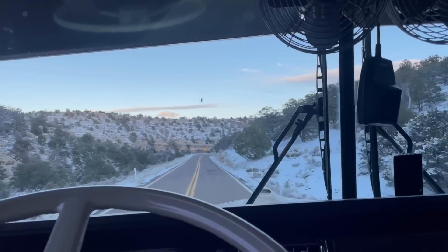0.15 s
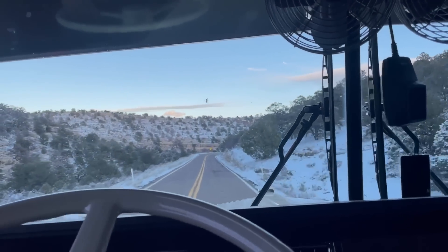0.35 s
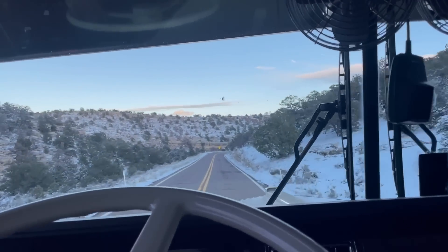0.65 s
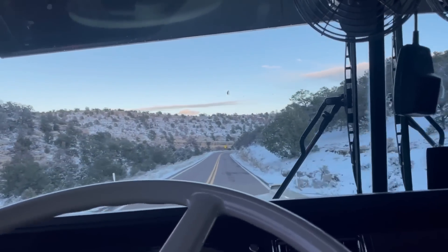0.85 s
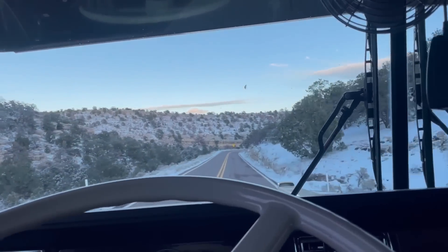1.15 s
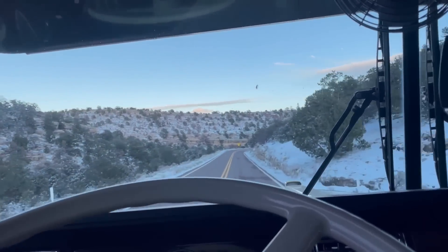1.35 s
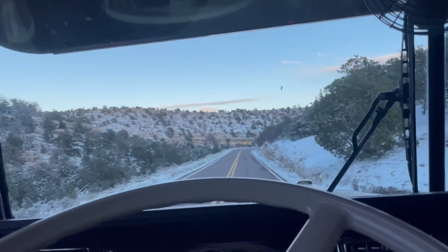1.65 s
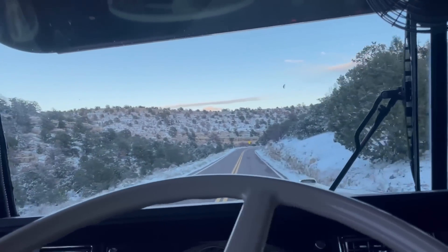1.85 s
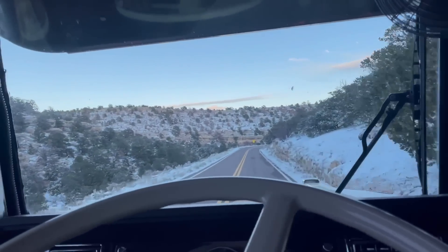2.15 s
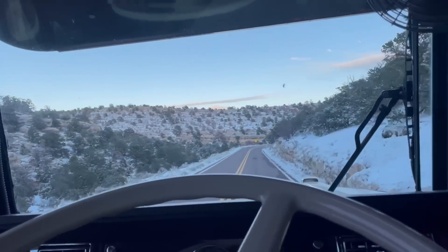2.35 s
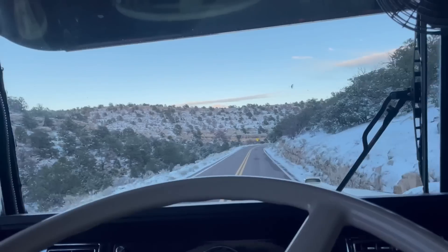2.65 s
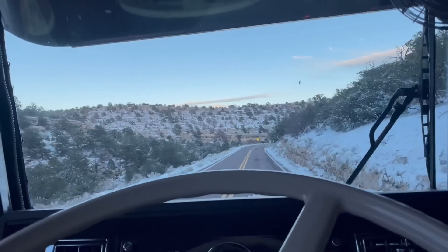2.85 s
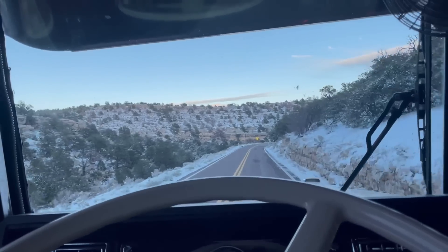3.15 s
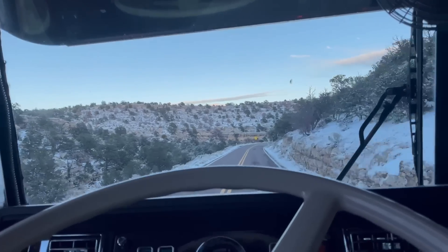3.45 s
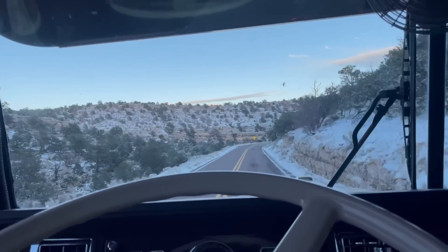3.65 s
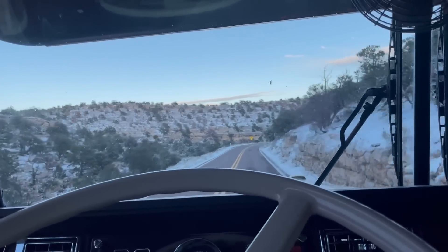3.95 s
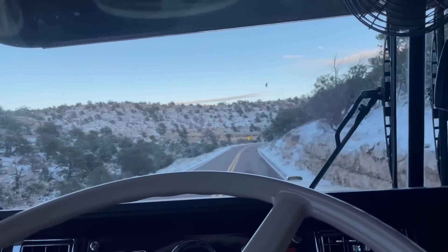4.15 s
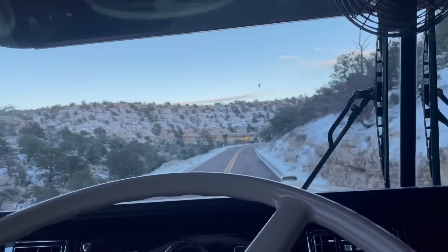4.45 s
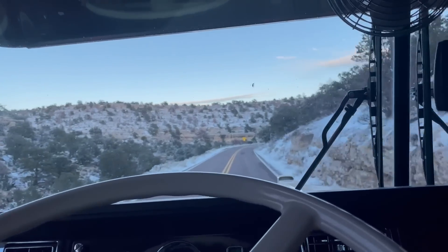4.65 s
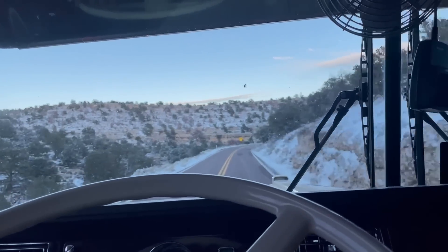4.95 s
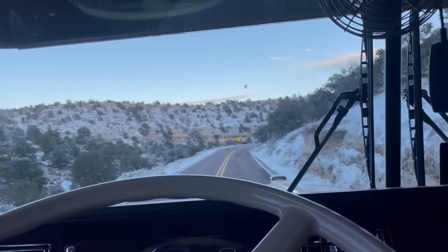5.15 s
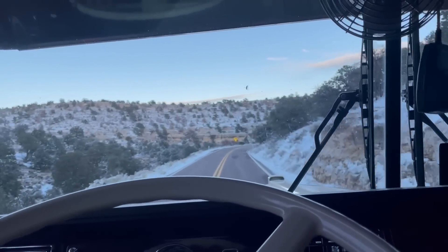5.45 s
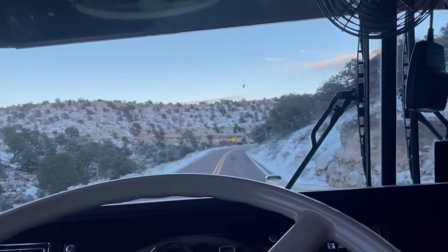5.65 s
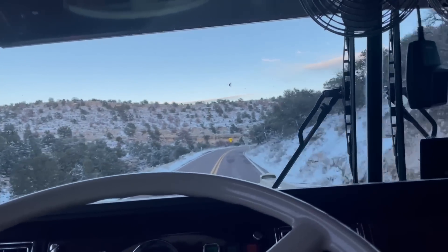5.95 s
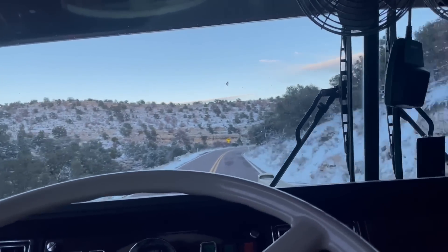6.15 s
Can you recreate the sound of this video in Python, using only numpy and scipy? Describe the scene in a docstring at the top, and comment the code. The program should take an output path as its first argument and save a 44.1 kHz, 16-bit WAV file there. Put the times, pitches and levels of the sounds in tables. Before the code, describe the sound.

Heard from the driver's area of a heavy truck: a deep, steady diesel drone with pulsing clatter, road rumble, faint whines and tiny rattles. The engine eases off in steps, leaving mostly low tyre rumble and wind. After four seconds the engine brake slams in, a loud, uneven, rapid-fire bark with hissing exhaust gas, ringing panels and a short hard cab echo, continuing to the end.

```python
"""The cab of a six-cylinder diesel truck: the engine pulls, coasts, then the engine brake cuts in.
Firings sound as phase-locked tones of the engine cycle, with a clatter of noise that pulses with them.
The brake valves vent each cylinder as a pulse that rings the exhaust stack and cab panels and blows gas.
Thin whines, one squeak and small rattles are added; road rumble and wind are coloured noise throughout.
Two microphone ports hear every source with differing level, phase and share of common sound."""
import sys
import numpy as np
from scipy import signal
from scipy.fft import rfft, irfft
from scipy.io import wavfile
from scipy.ndimage import uniform_filter1d

SR = 44100
rng = np.random.default_rng(int(sys.argv[2]) if len(sys.argv) > 2 else 0)


def log_audio(samples):
    """Write samples as a 16-bit WAV file to the path given in sys.argv[1]."""
    # one column per channel
    frames = np.atleast_2d(samples).T
    # limit to full scale, then quantise
    limited = np.clip(frames, -1, 1)
    pcm = np.round(limited * 32767).astype(np.int16)
    wavfile.write(sys.argv[1], SR, pcm)


N = 277830
TIME = np.arange(N) / SR  # s
FREQ = np.maximum(np.fft.rfftfreq(N, 1 / SR), 1)  # Hz

# Engine speed, which creeps up downhill and sags under the brake. Each row: time in s, firings per s.
FIRING_RATE = [(0, 69.9), (.6, 70.5), (1.5, 70.9), (4.2, 71.8), (6.3, 69.82)]
CYLINDER_COUNT = 6
# Fuelling, eased and then lifted off in two steps. Each row: time in s, load in dB.
LOAD = [(0, 0), (.63, -1), (.93, -2.5), (1.5, -3), (1.65, -9), (1.86, -10), (2.05, -16), (6.3, -13.5)]
# Engine tones. Each row: multiple of the cycle rate, rms level in dB at zero load, dB per dB of load.
ENGINE_TONES = [(4, -51, -1.1), (5, -40, -0.5), (9, -30, 0.24), (12, -33, 0.1), (14, -45.5, -0.5),
                (18, -40.5, 7), (20, -35, 0.43), (22, -44.5, 5), (28, -43, 0.2), (30, -44.5, 1.5),
                (38, -54, 2.5), (42, -44, 3), (44, -45.5, 0), (53, -50.5, 0.4), (56, -36, 1)]
PULL_BOOM_DB, BRAKE_BOOM_DB, BRAKE_BOOM_RISE_S = -12.5, -16, 0.08
BOOM_LEAD_MS, DRONE_TOP_HZ = .7, 1800
OCTAVE_DB, OCTAVE_DB_PER_LOAD_DB = -20, 1.18

# Spectrum of the block's combustion clatter. Each row: frequency in Hz, relative density in dB per Hz.
CLATTER_SPECTRUM = [(400, -21.5), (650, 9.5), (900, 5.5), (1400, -3), (1650, -7.5), (2200, -23.5),
                    (3300, -35), (5000, -51.5)]
CLATTER_DB, CLATTER_DEPTH = -39.5, 0.13

FIRST_VENT_S = 4.2784
# Cylinders in firing order. Each row: relative thump level in dB, thump delay in ms, bark delay in ms.
CYLINDERS = [(.1, 0.68, 1.136), (-5.5, -0.6, 0.94), (-3, -2.1, -0.35), (-0.1, -1.56, -0.95),
             (0.5, -0.12, 0.9), (0.4, -0.62, 0.6)]
# How far each cylinder's crack comes ahead of its even turn, in firing order: one lead in ms each.
CRACK_EARLY_MS = [.55, .8, .9, .9, .82, 1.18]
# Pressure vented by the brake, which climbs and then settles. Each row: time in s, level in dB.
PRESSURE = [(4.1, -18), (4.22, -13), (4.28, -10), (4.33, -3.5), (4.38, -1.5), (4.47, -2), (4.9, -2),
            (5.15, -3.5), (5.6, -4.5), (6.3, -4)]
# Fading of some resonances early in the braking. Each row: time in s, level in dB.
EARLY_FADE = [(4.28, -11), (4.35, 1.5), (4.6, -5.5), (4.95, -4), (5.15, -16.5), (6.3, -25)]
# How each part of a vent follows the pressure: offset in dB, dB per dB of pressure.
THUMP_FOLLOWS, BARK_FOLLOWS = (1.9, 0.72), (1.28, 0.47)
CRACK_FOLLOWS, GAS_FOLLOWS = (-31.5, 1.71), (-28, 0.87)
# Bark strength, uneven among the cylinders and shifting from cycle to cycle.
# Each row: start of the cycle in s, then the relative level in dB of each cylinder in firing order.
BARK_PATTERN = [(4.278, 0.5, -1, 3.5, -7, 2.5, 3), (4.362, 0, -2, -2.5, 1, -1.5, 3.5),
                (4.446, 1.5, -7, -4, -7, -0.5, 5), (4.53, -4, 1.5, -30, -23, 2, 1.5),
                (4.614, 1, -3, -4, -9, 3, 1.5), (4.74, -0.5, 0, 0.5, -8, 2, -2),
                (4.951, 2, -1, -4.5, -1.5, 1.5, -15), (5.204, 2, 3, -2.5, -9, 0.5, -9),
                (5.459, 4, 1, -3.5, -4, -0.5, -7), (5.714, 3, 3, -2.5, -10, -2, -4),
                (6.013, 2.5, 4, -4, -4.5, -2.5, 0)]
# Crack strength, likewise uneven and shifting.
# Each row: start of the cycle in s, then the relative level in dB of each cylinder in firing order.
CRACK_PATTERN = [(4.278, 4, 5, 0, 4.5, 0.5, 1.5), (4.362, 4, -1, -8, 4.5, -7, 1.5),
                 (4.446, 6, -0.5, -5, -11, 3.5, 0.5), (4.53, 5.5, 4, -13.5, -19, 3.5, -2),
                 (4.614, 1, 2.5, -26, -15, 4, 1.5), (4.74, -4, 1.5, -9, -9, 2, -0.5),
                 (4.951, 0, -3, -21, -6, -0.5, -2), (5.204, 1, 1, -11, -14, -2.5, -4),
                 (5.459, 2, 3, -16, -14, -1, -3), (5.714, 2, 5, -8, -17, -2.5, -0.5),
                 (6.013, 4.5, 4.5, -10, -16.5, -1.5, -1)]

# The gas in the stack warms up, so its resonances start flat and climb. Each row: time in s, pitch ratio.
WARMING = [(4.27, 0.9), (4.36, .955), (4.6, .97), (4.85, 0.99), (6.3, 0.99)]
# Lowest resonances of stack and cab. Each row: nominal centre in Hz, width in Hz,
# left relative level in dB, left sign, right relative level in dB, right sign.
THUMP_MODES = [(102, 10, -32, 1, -35, 1), (140, 10, -23, -1, -27, -1), (171, 10, -25, 1, -36, 1),
               (219, 16, -16.5, 1, -21, 1), (222, 10, -12.8, -1, -19.5, -1)]
# Middle resonances of stack and cab. Each row: nominal centre in Hz, width in Hz,
# left relative level in dB, left signed factor, right relative level in dB, right signed factor.
BARK_MODES = [(320.8, 7.9, -28, -0.81, -40.5, 0.74), (346.4, 14, -33, 1.0, -46.6, -0.62),
              (370.4, 7.5, -32.5, -1.1, -59.5, -0.92), (412.2, 13, -41, -1.0, -29, -0.83),
              (435, 17, -31, -0.6, -40.5, -1.1), (455, 81, -26.5, 0.77, -64.5, -0.59),
              (483.4, 10.6, -33, -0.68, -61, -1.0), (506, 8.9, -32.5, 1.0, -35, -1.05),
              (560.3, 6.8, -35, -1.03, -45, 1.0), (584, 31, -55, -1.0, -39, 0.92),
              (627, 8.6, -37.5, 0.95, -37.5, 1.0), (732.5, 13, -52, 1.0, -37, 0.8),
              (791, 30.0, -43.5, 0.89, -56, -1.1), (880.4, 10.0, -38, 0.93, -39, 1.0),
              (932, 34, -46, -0.88, -49.6, 0.67), (950, 52, -36.5, 0.57, -59.5, 0.85)]
# Low resonances heard mainly early in the braking. Each row: nominal centre in Hz, width in Hz,
# left relative level in dB, left signed factor, right relative level in dB, right signed factor.
EARLY_BARK_MODES = [(249.4, 21, -34.5, 1, -34.5, 0.95), (536, 17, -29, -0.64, -37.5, -1.1),
                    (651.6, 20.7, -26, 0.45, -34, 0.42), (814, 14, -48, 0.7, -45.5, 0.56),
                    (1290, 20, -40, -1, -50, -1)]
# Cab panels rung by the crack, steady in pitch. Each row: centre in Hz, width in Hz,
# left relative level in dB, left signed factor, right relative level in dB, right signed factor.
PANEL_MODES = [(1010, 110, 10, -1.06, -7, -1), (1071, 45, 12.5, -1, 2, -1), (1140, 72, 9.5, 1, 3, 1),
               (1232, 42, 10.5, -0.94, 10, -1.1), (1325, 50, 0, 1, 3.5, 1),
               (1382, 66, 13, -1.02, 9.5, -0.92), (1453, 50, 10.5, -1.02, -1.5, -1),
               (1520, 50, 8, 0.97, 2.5, -1), (1590, 40, 5.5, -1.1, 3, -1), (1686, 50, 7, -0.87, -10, -1),
               (1733, 41, 2, 0.97, 2, 0.91), (1822, 49, 12.5, 1, 9.5, 0.89), (2227, 48, 6, 1, 1, 1),
               (2463, 53, 3.5, 0.98, -11.5, -1), (2830, 44, -2, 1, -5, 0.9), (3067, 45, 4, 1, -8, -1),
               (3630, 74, 5, 1, -1, -1.3)]
# Upper resonances heard mainly early in the braking.
# Each row: centre in Hz, width in Hz, relative level in dB.
BLARE_MODES = [(855, 60, 1), (990, 47, 9), (1150, 56, 21), (1284, 60, 1), (1620, 35, -3), (2600, 67, 5),
               (3140, 31, 4), (3500, 60, -7)]
THUMP_TOP_HZ, BARK_TOP_HZ, CRACK_TOP_HZ = 320, 1300, 3500
THUMP_RIGHT_LATE_MS, BARK_RIGHT_LATE_MS, CRACK_RIGHT_LATE_MS = .76, -.64, .44
CRACK_GAIN_DB, CRACK_COMMON_LIFT = 39.5, .85
CAB_T60_S, CAB_DB = .12, -9
SNAP_HZ, SNAP_WIDTH_HZ, SNAP_GAIN_DB = 1650, 1550, 39
# The snap reaches each port directly, then off glass, doors and roof: delays in ms, gains in dB.
LEFT_PATHS_MS, LEFT_PATHS_DB = [.38, 3.75], [3, -4]
RIGHT_PATHS_MS, RIGHT_PATHS_DB = [0, .82, 2, 6.6], [-13, -1, -12, -10]

# Spectrum of the gas rush. Each row: frequency in Hz, relative density in dB per Hz.
GAS_SPECTRUM = [(300, -37.5), (500, -35), (1000, -29), (1800, -19), (2600, -30.5), (3600, -28),
                (4200, -35.5), (5200, -37.5), (5800, -44.5), (8500, -38.5), (12500, -47), (15500, -58.5)]
GAS_GAIN_DB, GAS_T60_S, GAS_STEADY, GAS_CONTRAST = -5.5, 0.13, 0.067, 1.06

# Centre pitches of the faint gear and pump whines: one frequency in Hz each.
WHINE_HZ = [1074, 1144, 1193, 1238, 1622, 3430, 5490]
# Strength of those whines. Each row: rms level in dB at zero load, dB per dB of load.
WHINE_LEVELS = [(-61.5, -0.9), (-51.5, 0), (-57, -0.5), (-54.5, 5), (-50.5, 1), (-71, 0.5), (-79.5, 0)]
WHINE_WANDER = .0008  # relative pitch spread

SQUEAK_S, SQUEAK_LENGTH_S, SQUEAK_HZ, SQUEAK_DB = .684, .008, 2520, -39.5
# Small rattles. Each row: start in s, peak level in dB.
RATTLES = [(0.1535, -50), (0.2294, -59), (0.3464, -50.5), (0.5087, -52), (0.5964, -51), (0.7028, -54),
           (1.482, -52), (1.9084, -47)]
RATTLE_HZ, RATTLE_WIDTH_HZ, RATTLE_ATTACK_S, RATTLE_T60_S = 12100, 2500, .003, .06

# Spectrum of tyre rumble and wind. Each row: frequency in Hz, relative density in dB per Hz.
ROAD_SPECTRUM = [(22, -37), (35, -13), (45, -8.5), (58, -3), (75, -10.5), (93, -11.5), (115, -3.5),
                 (135, -11.5), (170, -16), (245, -17), (285, -23), (340, -18.5), (460, -18.5), (550, -20),
                 (610, -24.5), (660, -20), (700, -26), (765, -24.5), (870, -27.5), (1010, -32.5),
                 (1170, -29.5), (1300, -33), (1430, -36), (1920, -37), (2050, -40.5), (2290, -39),
                 (2800, -43.5), (3530, -43.5), (3800, -48), (4400, -49.5), (5400, -51), (5900, -56.5),
                 (9000, -55), (12500, -63), (15500, -73)]
# Rise and fall of the road's bass. Each row: time in s, gain in dB.
RUMBLE = [(0, 4), (1, 2), (1.6, 0.5), (2, 1), (2.25, 1), (2.45, 6), (2.7, 4), (2.95, 5), (3.2, 4.5),
          (3.45, 3.5), (3.7, 5), (3.9, 6), (4.1, 6.5), (4.6, -1), (6.3, 1.5)]
ROAD_DB, RUMBLE_LEFT_DB, RUMBLE_LUMPS_DB = -25.5, 2, -0.56

# Level balance of the two ports. Each row: frequency in Hz, left minus right in dB.
BALANCE_DB = [(60, -2.5), (110, 9), (200, -2), (380, 4), (700, 2.5), (1290, 1.5), (2380, 4), (4400, 7),
              (8120, 1.5), (15000, -1.5)]
# Sound common to both ports. Each row: frequency in Hz, share from 0 to 1.
COMMON = [(60, 1), (130, 0.94), (400, 0.2), (2000, 0.23), (4500, 0.51), (8500, 0.3), (12500, 0.93)]
# Phase of sound from the stack. Each row: frequency in Hz, lead of the left port in radians.
STACK_LEAD = [(430, 2.2), (1380, 3.7), (1810, 5.3), (2840, 8.1), (3620, 6.9), (4910, 7.1), (5940, 5),
              (7580, 3.4), (9470, 3), (12500, .2), (15200, 0)]
# Phase of sound from the road and engine. Each row: frequency in Hz, lead of the left port in radians.
ROAD_LEAD = [(60, 0), (200, .5), (690, 1.5), (1640, -1), (2600, 1), (4740, .6), (5600, -.9), (7240, -1.8),
             (7670, -3), (9560, -3.5), (12400, -6.2), (15200, -6.3)]
CANCEL_HZ, CANCEL_WIDTH_HZ = 8576, 1730
EDGE_FADE_S, CEILING, TOP_HZ = .004, .97, 15600


def drone(cycle):
    """Harmonic synthesis: firings or vents boom in the cab, and other orders of the cycle follow the load."""
    firing = CYLINDER_COUNT * cycle + over_time(FIRING_RATE)[0] * BOOM_LEAD_MS / 1000
    load_db = over_time(LOAD)[0]
    braking = 1 - np.exp(-np.maximum(TIME - FIRST_VENT_S, 0) / BRAKE_BOOM_RISE_S)
    boom_gain = undb(PULL_BOOM_DB + load_db) + undb(BRAKE_BOOM_DB) * braking
    boom = boom_gain * np.cos(2 * np.pi * firing)
    # the octave is locked to the firing: flat crests, sharp troughs
    octave_db = OCTAVE_DB + OCTAVE_DB_PER_LOAD_DB * load_db + .5 * walk(3.4)
    tones = -undb(octave_db) * np.cos(2 * np.pi * 2 * firing)
    for order, db, share in ENGINE_TONES:
        # each tone wanders in phase on its own, higher orders more
        turn = order * (cycle + 0.0016 * walk(17)) + rng.random()
        tone_db = db + share * load_db + 0.21 * walk(26)
        tones = tones + undb(tone_db) * np.cos(2 * np.pi * turn)
    return soften(ports(np.sqrt(2) * (boom + tones), np.zeros(N), ROAD_LEAD), DRONE_TOP_HZ)


def brake(cycle):
    """Impulse excitation: each cylinder vents in turn, along its own path, into stack, panels and cab air."""
    turns = np.arange(int(cycle[-1] * CYLINDER_COUNT))
    cylinder = turns % CYLINDER_COUNT
    thump_db, thump_ms, bark_ms = np.array(CYLINDERS)[cylinder].T
    time_chance, size_chance = rng.standard_normal((len(turns), 2)).T
    at = np.interp(turns / CYLINDER_COUNT, cycle, TIME) + 0.021 * time_chance / 1000
    pressure_db = over_time(PRESSURE)[0]
    vent_pressure_db = np.interp(at, TIME, pressure_db)
    crack_pattern_db = pattern(CRACK_PATTERN, at)

    def vents(late_ms, follows, relative_db):
        """Each vent is an impulse whose strength follows the pressure, with a small scatter."""
        db = follow(follows, vent_pressure_db) + relative_db + .7 * size_chance
        return pulses(at + late_ms / 1000, db)

    thumps = vents(thump_ms, THUMP_FOLLOWS, thump_db)
    barks = vents(bark_ms, BARK_FOLLOWS, pattern(BARK_PATTERN, at))
    cracks = vents(-np.array(CRACK_EARLY_MS)[cylinder], CRACK_FOLLOWS, crack_pattern_db)
    puffs = vents(0, GAS_FOLLOWS, GAS_CONTRAST * crack_pattern_db)
    early_gain = undb(over_time(EARLY_FADE)[0])
    # the gate opens just before the first vent
    engaged = np.clip((TIME - FIRST_VENT_S) * 100 + 1, 0, 1)
    struck = stack(thumps, barks, early_gain) + crack(cracks, early_gain) + snap(cracks)
    return struck * engaged + gas(puffs, pressure_db)


def stack(thumps, barks, early_gain):
    """Forced resonance: softened pulses ring the low thump and middle bark of the exhaust stack."""
    barks = soften(barks, BARK_TOP_HZ)
    thump = ring_pair(soften(thumps, THUMP_TOP_HZ), THUMP_MODES, THUMP_RIGHT_LATE_MS)
    bark = ring_pair(barks, BARK_MODES, BARK_RIGHT_LATE_MS)
    early_bark = ring_pair(early_gain * barks, EARLY_BARK_MODES, 0)
    # a pulse of this size once a cycle gives tones of amplitude 1
    unit = SR * CYLINDER_COUNT / (2 * FIRING_RATE[-1][1])
    return unit * (thump + bark + early_bark)


def crack(cracks, early_gain):
    """Modal vibration and reverberation: the crack rings cab panels, and the hard walls add a dense tail."""
    softened = soften(cracks, CRACK_TOP_HZ)
    rung = undb(CRACK_GAIN_DB) * ring_pair(softened, PANEL_MODES, CRACK_RIGHT_LATE_MS, resonance)
    blare = undb(CRACK_GAIN_DB) * ring(early_gain * cracks, BLARE_MODES)
    tail_s = np.arange(SR // 10) / SR
    # an independent tail for each port
    tails = rng.standard_normal((2, len(tail_s))) * np.exp(-np.log(1000) * tail_s / CAB_T60_S)
    tails = [h / np.sqrt(np.sum(h ** 2)) for h in tails]
    cab = np.array([signal.fftconvolve(rung[0] + blare, h)[:N] for h in tails])
    return rung + ports(blare, cab[1], STACK_LEAD, CRACK_COMMON_LIFT) + undb(CAB_DB) * cab


def snap(cracks):
    """Direct sound and early reflections: the pressure front is a dry snap arriving by several paths."""
    band = signal.iirpeak(SNAP_HZ, SNAP_HZ / SNAP_WIDTH_HZ, SR)
    front = undb(SNAP_GAIN_DB) * signal.filtfilt(*band, cracks)
    left = paths(front, LEFT_PATHS_MS, LEFT_PATHS_DB)
    right = paths(front, RIGHT_PATHS_MS, RIGHT_PATHS_DB)
    return np.array([left, right])


def gas(puffs, pressure_db):
    """Turbulent flow: noise swells at each vent and decays onto a steady flow set by the pressure."""
    decay = np.exp(-np.log(1000) / (GAS_T60_S * SR))
    puff = signal.lfilter([1], [1, -decay], puffs)
    steady = GAS_STEADY * undb(follow(GAS_FOLLOWS, pressure_db))
    flow = uniform_filter1d(puff + steady, size=220)  # smoothed over 5 ms
    return flow * undb(GAS_GAIN_DB) * hiss(GAS_SPECTRUM, STACK_LEAD)


def clatter(cycle):
    """Amplitude modulation: noise from the block pulses with the firings and follows the load."""
    pulse = 1 + CLATTER_DEPTH * np.cos(2 * np.pi * CYLINDER_COUNT * cycle)
    return pulse * undb(CLATTER_DB + over_time(LOAD)[0]) * hiss(CLATTER_SPECTRUM, ROAD_LEAD)


def whines():
    """Frequency modulation: thin tones of gears and pumps wander a little in pitch and level."""
    load_db = over_time(LOAD)[0]
    out = np.zeros(N)
    for hz, (db, share) in zip(WHINE_HZ, WHINE_LEVELS):
        gain = undb(db + share * load_db + 1.3 * walk(8.2))
        turn = np.cumsum(hz * (1 + WHINE_WANDER * walk(8))) / SR
        out += gain * np.cos(2 * np.pi * turn)
    return ports(np.sqrt(2) * out, np.zeros(N), ROAD_LEAD)


def squeak():
    """Tone burst: one short squeak of cab trim is a sine under a flat-topped envelope."""
    envelope = np.exp(-((TIME - SQUEAK_S) / SQUEAK_LENGTH_S) ** 4)
    tone = envelope * np.sin(2 * np.pi * SQUEAK_HZ * TIME)
    return ports(undb(SQUEAK_DB) * tone, np.zeros(N), ROAD_LEAD)


def rattles():
    """Damped noise bursts: loose fittings tick in a narrow treble band."""
    out, since = np.zeros(N), TIME[:SR // 10]
    shape = (1 - np.exp(-since / RATTLE_ATTACK_S)) * np.exp(-np.log(1000) * since / RATTLE_T60_S)
    for s, db in RATTLES:
        burst = shape * rng.standard_normal(len(since))
        for _ in range(2):
            burst = resonance(burst, RATTLE_HZ, RATTLE_WIDTH_HZ)
        out[int(s * SR):][:len(since)] += undb(db) * burst / np.abs(burst).max()
    return ports(out, np.zeros(N), ROAD_LEAD)


def road():
    """Broadband noise: tyre rumble through the frame and wind; the bass heaves with the road surface."""
    steady = hiss(ROAD_SPECTRUM, ROAD_LEAD)
    bass = soften(steady, 150)
    side_db = RUMBLE_LEFT_DB / 2 * np.array([[1], [-1]])
    heave_db = over_time(RUMBLE)[0] + RUMBLE_LUMPS_DB * walk(12.0) + side_db
    return undb(ROAD_DB) * (steady + bass * (undb(heave_db) - 1))


def follow(follows, pressure_db):
    """A power law of pressure is a straight line in dB."""
    offset_db, slope = follows
    return offset_db + slope * pressure_db


def pattern(table, at):
    """Periodic excitation: each vent takes its cylinder's level, read at the start of its cycle."""
    s, *columns = np.transpose(table)
    starts = at[::CYLINDER_COUNT]
    return np.transpose([np.interp(starts, s, c) for c in columns]).ravel()[:len(at)]


def pulses(at, db):
    """Fractional delay: each impulse is shared between two samples."""
    whole, part = np.divmod(at * SR, 1)
    whole, size = whole.astype(int), undb(db)
    out = np.zeros(N + 100)
    out[whole] = size * (1 - part)
    out[whole + 1] = size * part
    return out[:N]


def resonance(x, hz, width):
    """A damped oscillator, gain 1 at its centre."""
    return signal.lfilter(*signal.iirpeak(hz, hz / width, SR), x)


def gliding(x, hz, width):
    """A stack resonance rises with the sound speed of the warming gas; silent before the brake."""
    start = int((FIRST_VENT_S - .02) * SR)
    turn = np.exp(2j * np.pi * hz * np.cumsum(over_time(WARMING)[0][start:]) / SR)
    pole = np.exp(-np.pi * width / SR)
    # shift the moving centre down to 0 Hz, smooth there, and shift back
    smooth = signal.lfilter([1 - pole], [1, -pole], x[start:] / turn)
    out = np.zeros(N)
    out[start:] = 2 * np.real(turn * smooth)
    return out


def ring(x, modes):
    """Modal superposition, neighbours in opposite sign as in a pipe."""
    return sum((-1) ** k * undb(db) * resonance(x, hz, width) for k, (hz, width, db) in enumerate(modes))


def ring_pair(x, modes, right_late_ms, voice=gliding):
    """Modal superposition at two points: each mode has its own strength and polarity at each port."""
    rings = np.array([voice(x, m[0], m[1]) for m in modes])
    _, _, left_db, left_factor, right_db, right_factor = np.transpose(modes)
    left = (undb(left_db) * left_factor) @ rings
    right = (undb(right_db) * right_factor) @ rings
    return np.array([left, np.roll(right, int(right_late_ms * SR / 1000))])


def paths(x, late_ms, db):
    """Multipath propagation: a sum of delayed copies."""
    return sum(undb(d) * np.roll(x, round(ms * SR / 1000)) for ms, d in zip(late_ms, db))


def soften(x, hz):
    """Low-pass filtering: a steep loss above hz without delay."""
    return signal.sosfiltfilt(signal.butter(3, hz, fs=SR, output="sos"), x)


def hiss(spectrum, lead):
    """Spectral shaping of white noise, to rms 1 on the left port."""
    white = rfft(rng.standard_normal((2, N)))
    a, b = irfft(white * undb(over_freq(spectrum)), N)
    return ports(level(a, 0), level(b, 0), lead)


def ports(common, other, lead, lift=0):
    """Partial coherence: right hears the left's sound shifted, rebalanced and mixed with another."""
    share = np.clip(over_freq(COMMON), 0, 1)
    share = np.clip(share + lift * (1 - share), 0, 1)
    shifted = share * rfft(common) * np.exp(-1j * over_freq(lead))
    right = shifted + np.sqrt(1 - share ** 2) * rfft(other)
    return np.array([common, irfft(right * undb(-over_freq(BALANCE_DB)), N)])


def walk(rate):
    """A slow random process of rms 1, redrawn at the given rate in Hz and smoothed."""
    k = int(SR / rate)
    steps = np.repeat(rng.standard_normal(N // k + 1), k)
    return level(uniform_filter1d(steps, k)[:N], 0)


def over_time(table):
    """Linear interpolation of a table's columns at every sample."""
    s, *columns = np.transpose(table)
    return [np.interp(TIME, s, c) for c in columns]


def over_freq(table):
    """Interpolation at every frequency bin, straight on a logarithmic axis."""
    hz, value = np.transpose(table)
    return np.interp(np.log(FREQ), np.log(np.maximum(hz, 1)), value)


def level(x, db):
    """Normalisation to an rms level in dB."""
    return x * undb(db) / np.sqrt(np.mean(x ** 2))


def undb(db):
    """Amplitude ratio of a level in dB."""
    return 10 ** (np.asarray(db) / 20)


def scene():
    """Superposition: engine sources share one crankshaft angle, in engine cycles from the first vent."""
    cycle = np.cumsum(over_time(FIRING_RATE)[0]) / SR / CYLINDER_COUNT
    cycle -= np.interp(FIRST_VENT_S, TIME, cycle)
    engine = drone(cycle) + brake(cycle) + clatter(cycle)
    return engine + whines() + squeak() + rattles() + road()


def record(dry):
    """Saturation rounds peaks; opposed ports cancel in sum round one treble band; a low-pass cuts the top."""
    dry = dry * np.minimum(np.minimum(TIME, TIME[::-1]) / EDGE_FADE_S, 1)
    dry = dry / (1 + np.abs(dry / CEILING) ** 6) ** (1 / 6)
    mid, side = (dry[0] + dry[1]) / 2, (dry[0] - dry[1]) / 2
    edges = [CANCEL_HZ - CANCEL_WIDTH_HZ / 2, CANCEL_HZ + CANCEL_WIDTH_HZ / 2]
    mid = signal.sosfiltfilt(signal.butter(2, edges, "bandstop", fs=SR, output="sos"), mid)
    both = np.array([mid + side, mid - side])
    return signal.sosfiltfilt(signal.ellip(8, .1, 40, TOP_HZ, fs=SR, output="sos"), both)


dry = scene()
out = record(dry)
log_audio(out)
```